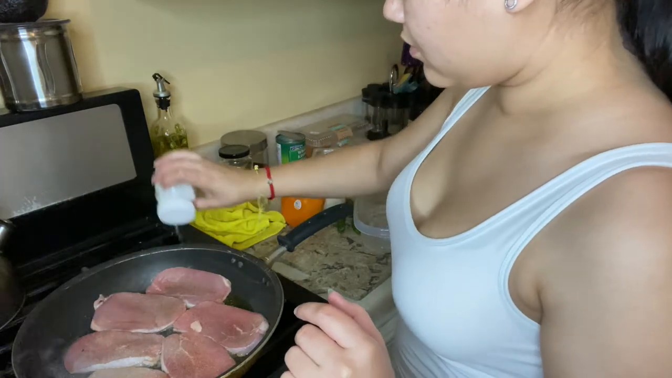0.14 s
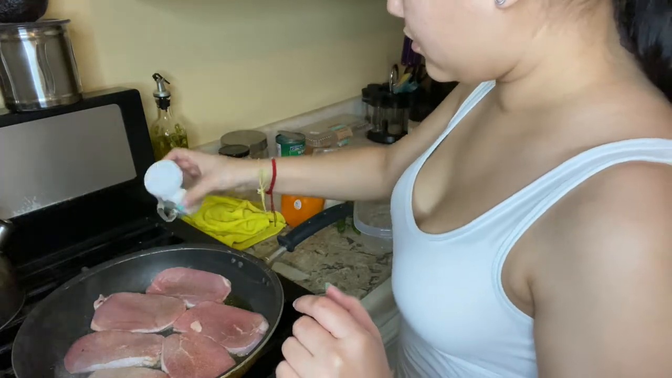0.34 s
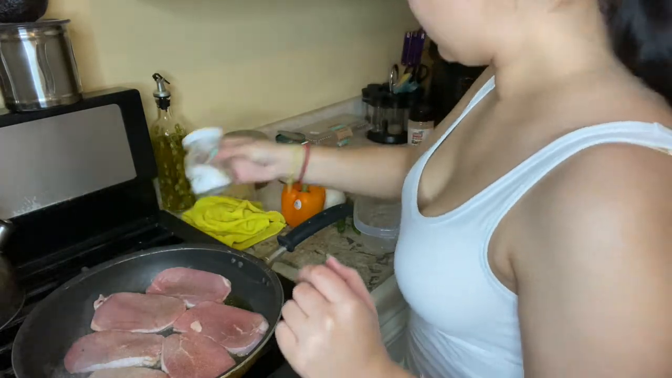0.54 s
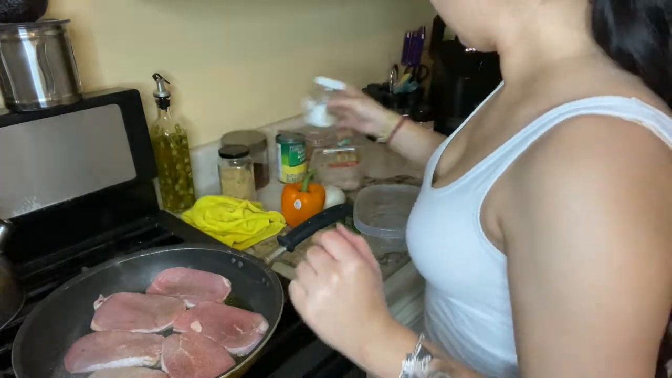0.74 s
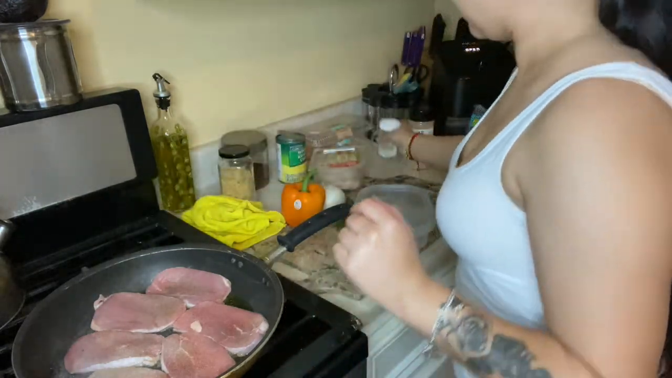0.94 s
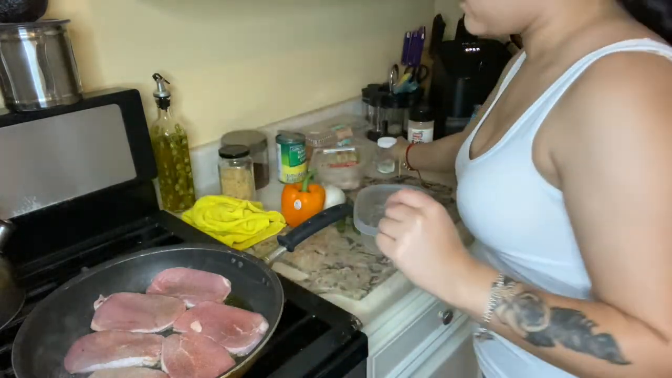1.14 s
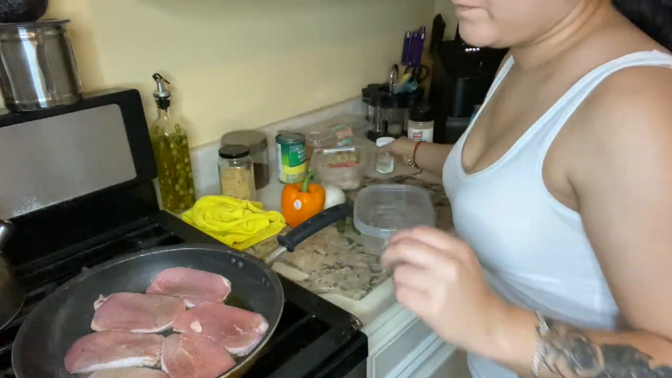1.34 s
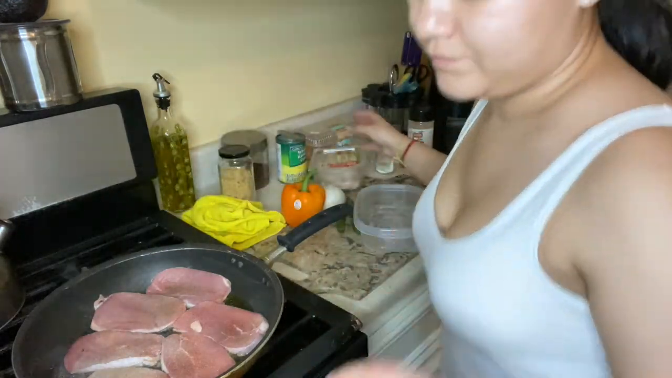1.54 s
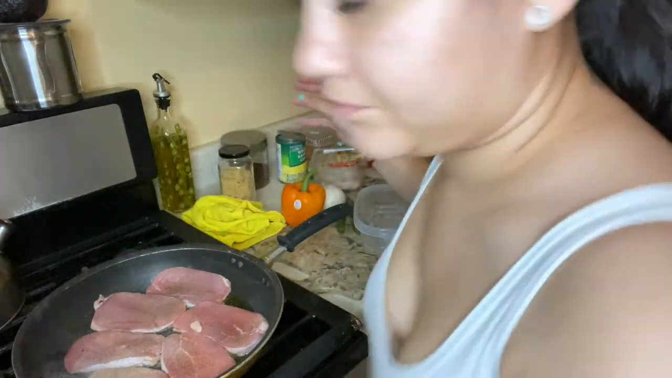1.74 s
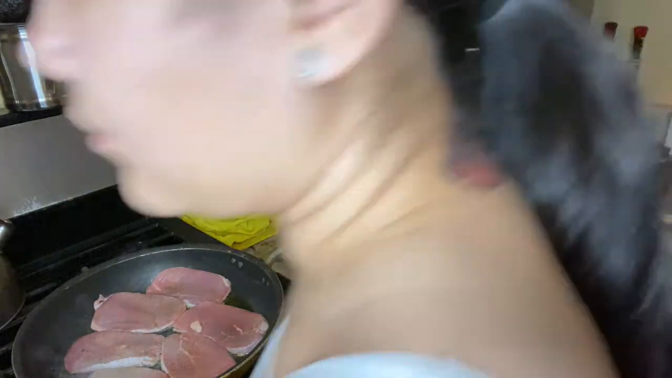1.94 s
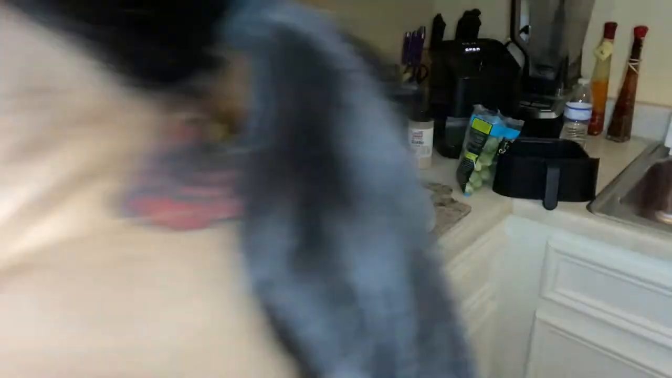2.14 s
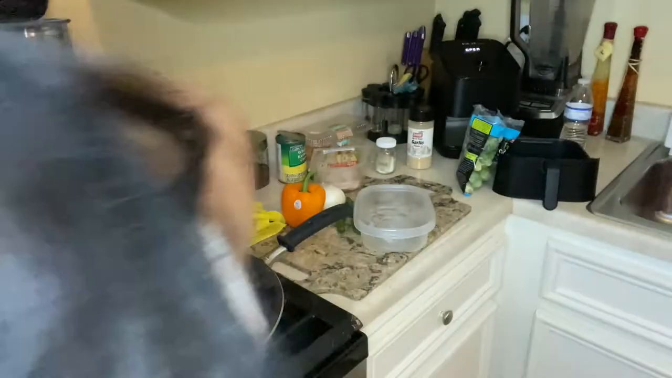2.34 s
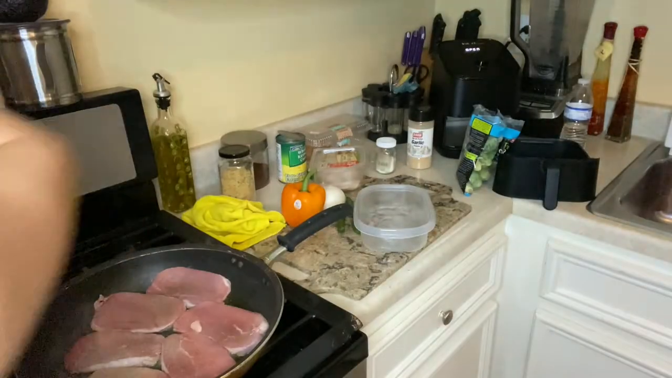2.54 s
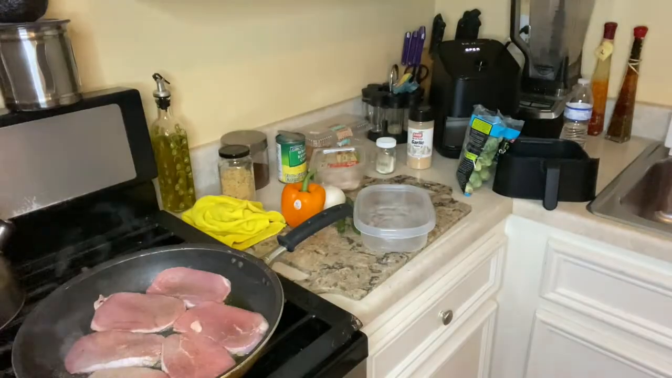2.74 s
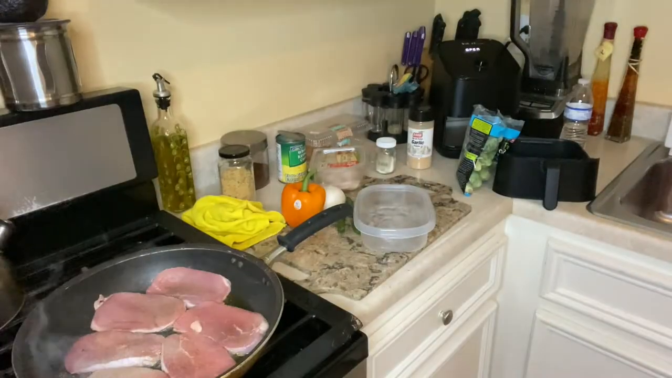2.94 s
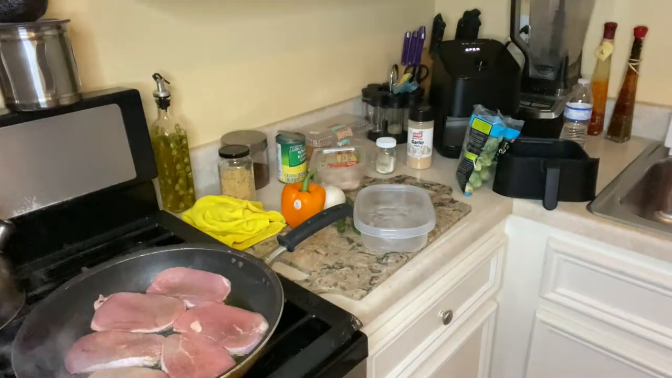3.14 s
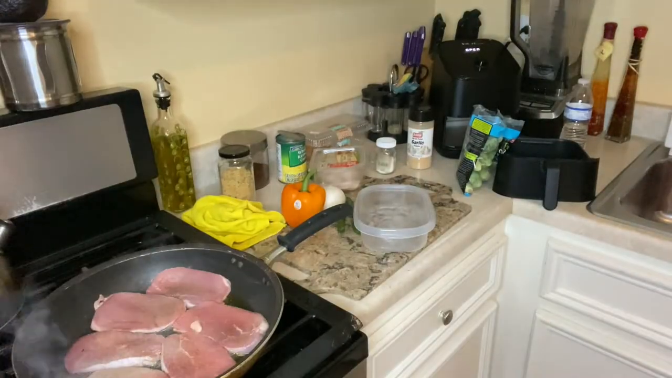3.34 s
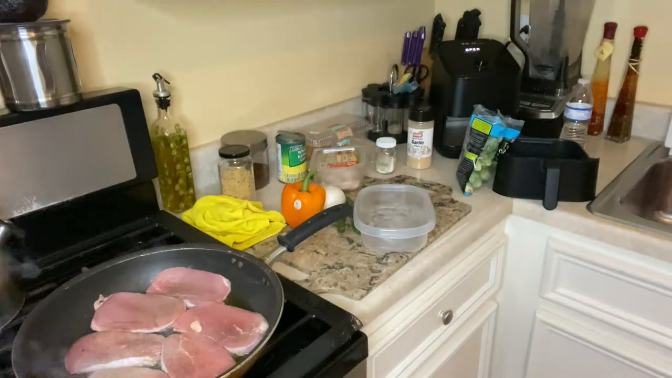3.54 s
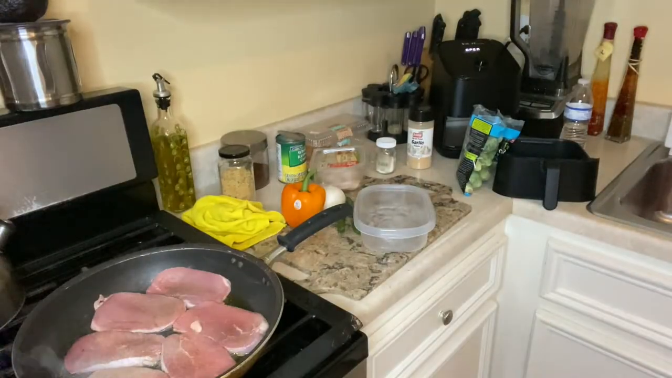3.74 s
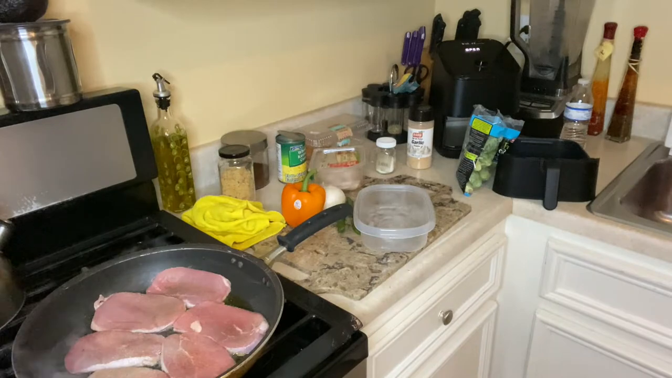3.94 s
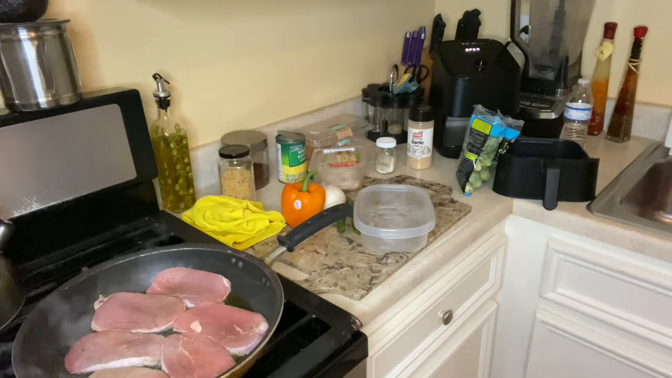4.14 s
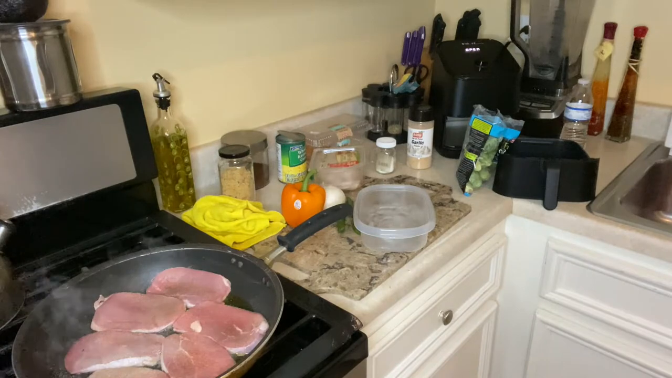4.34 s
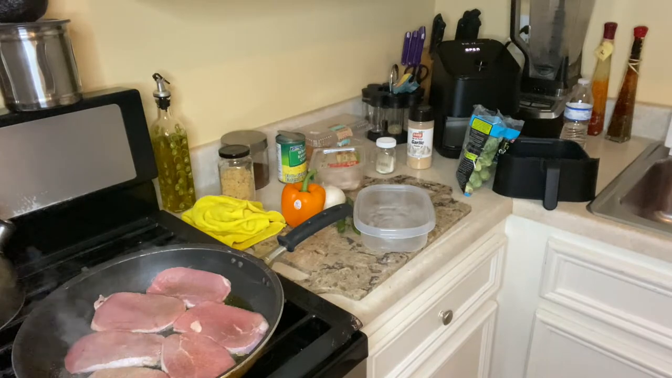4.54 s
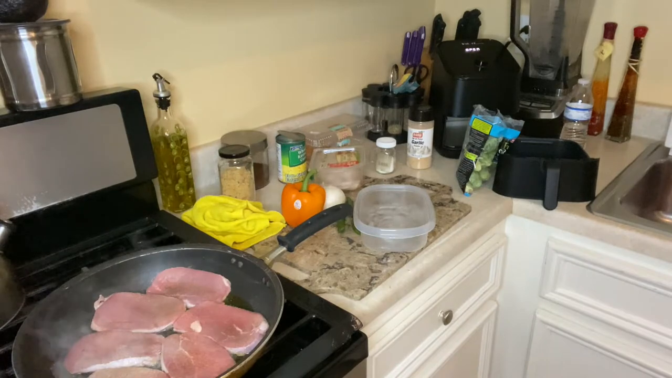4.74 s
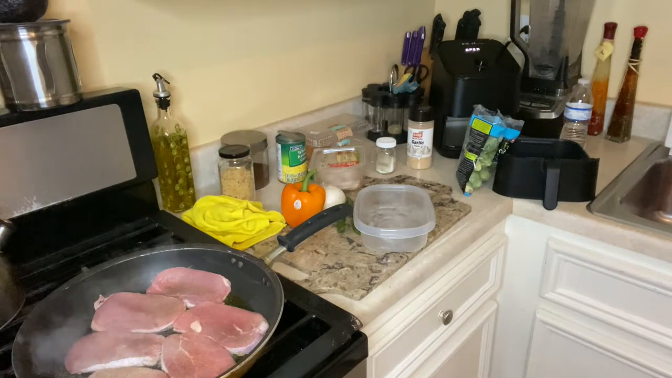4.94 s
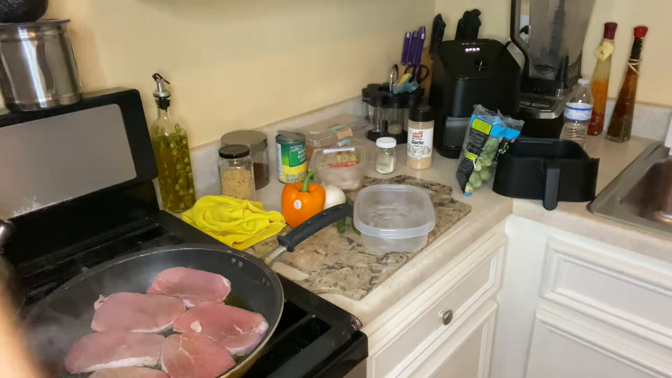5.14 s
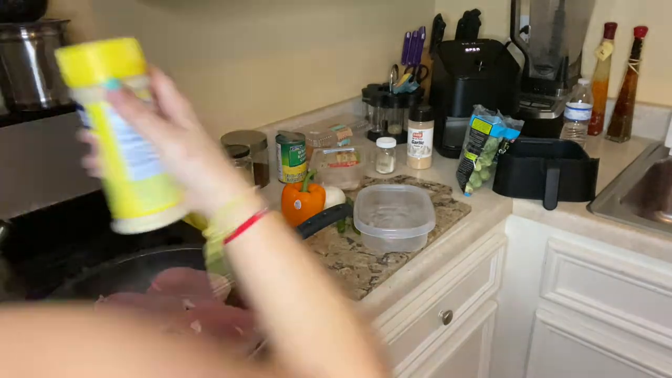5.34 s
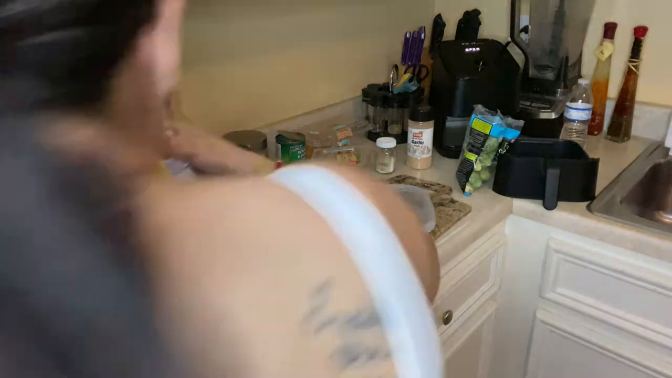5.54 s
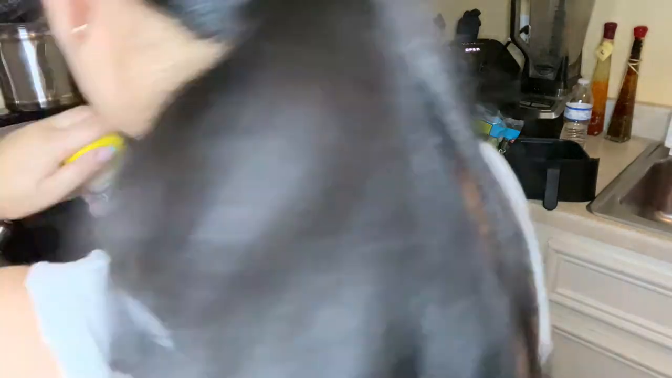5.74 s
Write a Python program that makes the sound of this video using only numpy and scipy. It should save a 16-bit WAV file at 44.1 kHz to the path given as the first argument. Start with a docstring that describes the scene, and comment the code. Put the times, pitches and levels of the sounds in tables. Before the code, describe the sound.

Over a softly hissing pan and low hum, a jar lands, dull steps pass, a cupboard clatters and slams, and dry seasoning begins to shake.

```python
"""A jar knocks and rings on a stone counter; then come footfalls, the knocks, scrapes and clacks of a cupboard,
its door slamming, and the first grains of a newly shaken jar, over a low hum and a hissing pan.
Blows sound as sums of decaying modes, clacks as short noise bursts, scraping as random slips that ring wood,
and grains, hum, rumble and hiss as shaped noise. The hiss dips, most as the cook passes.
A decaying noise response adds the room, and a two-port microphone limits the band."""
import sys
import numpy as np
from scipy import signal
from scipy.fft import rfft, irfft, next_fast_len
from scipy.io import wavfile
from scipy.ndimage import uniform_filter1d

SR = 44100
rng = np.random.default_rng(int(sys.argv[2]) if len(sys.argv) > 2 else 0)


def materialize(psi):
    """Save the field psi as 16-bit PCM at rate SR to the path in sys.argv[1].

    A 1-D psi becomes a single channel; in a 2-D psi each row is a channel.
    """
    bounded = np.clip(np.atleast_2d(psi).T, -1, 1)
    quanta = np.round(bounded * 32767).astype(np.int16)
    wavfile.write(sys.argv[1], SR, quanta)


N = 259308  # length in samples


def amp(db):
    """Logarithmic level: decibels become a pressure ratio."""
    return 10 ** (np.asarray(db) / 20)


def evened(x):
    """Mean-square normalisation: scales a signal to rms 1."""
    return x / np.sqrt(np.mean(x ** 2) + 1e-20)


def read(points, hz):
    """Logarithmic pitch scale: interpolates a spectrum over log frequency."""
    f, value = np.transpose(points)
    return np.interp(np.log(hz + 1), np.log(f + 1), value)


def curve(rows, t, axis=1):
    """Envelope: interpolates one column of a time table."""
    rows = np.transpose(rows)
    return np.interp(t, rows[0], rows[axis])


def add(mix, s, sound):
    """Superposition: adds a sound to the mix from time s on."""
    part = mix[round(s * SR):][:len(sound)]
    part += sound[:len(part)]


# Every mode has a weaker neighbour: largest detuning as a share of pitch, and its relative level in dB.
TWIN_SPREAD, TWIN_DB = 0.018, -9


def blow(modes, db, centre, spread, ring_factor, swell_cycles, chatter_ms):
    """Modal synthesis: a blow excites decaying modes near its centre pitch; low modes swell slowly."""
    t = np.arange(SR // 2) / SR
    hz, mode_db, t60 = np.transpose(modes)[:, :, None]
    octaves_off = np.log2(hz / 100) - centre
    height = np.exp(-.5 * (octaves_off / spread) ** 2) * amp(mode_db)
    # the edge lands unevenly, so the modes start apart
    late = rng.random(hz.shape) * chatter_ms / 1000
    since = np.maximum(t - late, 0)
    swell = 1 - np.exp(-since * hz / swell_cycles)
    envelope = height * swell * amp(-60 * since / t60 / ring_factor)
    # two close pitches beat
    twin_hz = hz * (1 + TWIN_SPREAD * rng.uniform(-0.82, 1, hz.shape))
    main = np.sin(2 * np.pi * hz * since)
    twin = amp(TWIN_DB) * np.sin(2 * np.pi * twin_hz * since)
    ring = envelope * (main + twin) / (1 + amp(TWIN_DB) / 2)
    return amp(db) * ring.sum(0) / np.linalg.norm(height)


def blows(hits, modes, swell_cycles, chatter_ms):
    """Superposition of blows: each hit rings the same set of modes."""
    out = np.zeros(N)
    for s, *how in hits:
        add(out, s, blow(modes, *how, swell_cycles=swell_cycles, chatter_ms=chatter_ms))
    return out


# Resonances of clacking jars. Each row: frequency in Hz, width in Hz, height in dB.
JAR_RESONANCES = [(950, 130, 2), (2250, 570, 1.5), (3340, 990, -0.5), (4100, 380, 3), (8400, 2100, 10)]


def clack(db, length_ms, tilt_db, rise_ms):
    """Impulsive contact: a burst of tilted noise, coloured by jar resonances, rises and decays."""
    count = 4096
    hz, ms = np.fft.rfftfreq(count, 1 / SR), np.arange(count) / SR * 1000
    tilt = amp(tilt_db * np.log2(np.maximum(hz, 700) / 3000))
    bass_cut = hz ** 2 / (hz ** 2 + 600 ** 2)
    resonance_db = sum(peak_db / (1 + (2 * (hz - f) / width) ** 2) for f, width, peak_db in JAR_RESONANCES)
    colour = tilt * bass_cut * amp(resonance_db)
    burst = irfft(rfft(rng.standard_normal(count)) * colour)
    # the level refers to the band from 1500 to 8000 Hz
    band = irfft(rfft(burst) * (hz > 1500) * (hz < 8000))
    envelope = (1 - np.exp(-ms / rise_ms)) * np.exp(-ms / length_ms)
    return amp(db) * burst / band.std() * envelope


# Left-right likeness of the noise. Each row: frequency in Hz, likeness from 0 to 1.
LIKENESS = [(60, 0.97), (200, 0.74), (500, 0.078), (1400, 0.12), (2000, 0.12), (2500, 0.11), (3500, 0.04),
            (5000, 0.13), (7000, 0.16)]
PORT_LAG_S = 7.4 / SR  # what the ports share arrives later at the right


def noise(field_db, size, count):
    """Partial coherence: two-port noise whose dB over (Hz, s) the given rule sets."""
    hop = size // 4
    hz = np.fft.rfftfreq(size, 1 / SR)[:, None]
    t = np.arange(count // hop + 5) * hop / SR
    a, b, c, d = rng.standard_normal((len(t), len(hz), 4)).T
    same = np.clip(read(LIKENESS, hz), 0, 1)
    left, own = a + 1j * b, c + 1j * d
    trail = np.exp(-2j * np.pi * hz * PORT_LAG_S)
    right = same * left * trail + np.sqrt(1 - same ** 2) * own
    spectra = np.array([left, right]) * amp(field_db(hz, t))
    return signal.istft(spectra, nperseg=size, noverlap=size - hop)[1][:, :count]


# The jar lands on rim and base, then rocks. Each row: start in seconds, level in dB,
# centre of the ring in octaves over 100 Hz, spread in octaves, ring length factor.
JAR_HITS = [(1.111, -10.5, 5.5, 2.4, 0.59), (1.1132, -9, 3.54, 2.54, 1.24), (1.138, -20.5, 2.1, 0.39, 0.95),
            (1.158, -25, 3.1, 0.25, 1), (1.205, -30, 2.7, 0.44, 0.91)]
# Modes of jar and counter. Each row: frequency in Hz, level in dB, nominal 60 dB decay in seconds.
COUNTER_MODES = [(200.5, 0, 0.14), (267, -3, .07), (300, 0, 0.05), (369, -5.5, 0.11), (408, -3.5, 0.12),
                 (432.7, -2.5, 0.113), (520, -9, 0.069), (596, -11, 0.13), (730, -2, 0.093),
                 (860, -12, .05), (906, -4, 0.2), (980, -0.5, 0.032), (1085, -0.5, 0.066),
                 (1090, -12, 0.026), (1353, 5.5, 0.022), (1470, -4, 0.044), (1690, -15, .04),
                 (1750, -4.5, 0.027), (2020, -9, 0.028), (2250, -11.5, 0.042), (2630, -11.5, 0.09),
                 (2860, -24, .02), (3280, -11.5, 0.023), (3650, -20, .015), (4330, -24, 0.012)]
# The glass cracks on the stone. One row: level in dB, decay constant in ms, tilt in dB per octave,
# rise constant in ms.
GLASS_CRACK = -25.5, 4, -11, 1.5


def jar():
    """Modal response to impact: the landing jar rings with the counter, and the contact cracks."""
    out = blows(JAR_HITS, COUNTER_MODES, swell_cycles=0.32, chatter_ms=1.7)
    add(out, JAR_HITS[0][0], clack(*GLASS_CRACK))
    return out


# Dense small modes of jar and slab. Each row: frequency in Hz, relative level in dB per Hz.
DIFFUSE_COLOUR = [(120, -7), (250, -3), (380, 1.5), (700, 3), (900, 1), (1300, -4), (1700, -1.5),
                  (2300, -8), (2600, -7), (3000, -14), (4000, -21.5), (7000, -37)]


def diffuse():
    """High modal density: a coloured pulse at the landing stands for modes heard only through the room."""
    size, out = 384, np.zeros(N)
    response = irfft(amp(read(DIFFUSE_COLOUR, np.fft.rfftfreq(size, 1 / SR))))
    pulse = np.roll(response, size // 2) * np.hanning(size)
    add(out, JAR_HITS[0][0], amp(7.5) * pulse / np.linalg.norm(pulse))
    return out


# Knocks on the cupboard, with a few dull footfalls; small parts ring high. Each row: start in seconds,
# level in dB, centre of the ring in octaves over 100 Hz, spread in octaves, ring length factor.
KNOCK_HITS = [(2.737, -26, 0.56, 0.44, 0.83), (3.9005, -27.5, 2.86, 0.28, 0.59),
              (3.908, -29, 1.3, 0.36, 1.8), (3.934, -26, 1, 0.67, 0.74), (3.919, -24, 0.24, 0.38, 0.55),
              (3.965, -27, 2.15, 0.14, 1.04), (3.983, -24, 0.2, .4, 0.4), (4.005, -30, 0.4, 0.27, 0.73),
              (4.028, -23.5, 2.06, 0.54, 0.51), (4.036, -18.5, 1.83, 0.34, 1.03),
              (4.045, -20, 0.42, 0.46, 0.84), (4.07, -44, 4.17, 0.09, 1.9), (4.088, -30.5, 2.7, 0.32, 0.66),
              (4.145, -32.5, 2.1, 0.23, 0.79), (4.174, -33, 0.18, 0.35, 0.4), (4.199, -31, 2.2, 0.9, 0.8),
              (4.254, -25.5, 0.23, 0.56, 0.67), (4.258, -46, 2.6, 0.73, 0.61),
              (4.289, -23.5, 2.98, .2, 0.6), (4.3342, -15, 3.08, 0.15, 0.65),
              (4.3354, -14.5, 1.64, 0.22, 0.43), (4.355, -26, 2.92, 0.7, 1), (4.38, -33, 1.5, 0.46, 0.73),
              (4.4, -34.5, 1.5, 0.34, 1.1), (4.425, -35, 1.57, 0.37, 0.65), (4.879, -37, 0.42, 0.36, 1.3),
              (5.012, -30, .08, 0.43, 0.75)]
# Modes of the woodwork. Each row: frequency in Hz, level in dB, nominal 60 dB decay in seconds.
WOOD_MODES = [(100.2, -3, 0.62), (119.3, 4.5, 0.17), (167, 5.5, 0.13), (225, 3.5, 0.12), (250, -9, 0.1),
              (289, 4, 0.09), (381, -1, 0.058), (428, -2, 0.12), (510, -10, 0.06), (600, -4, 0.11),
              (672, -3, 0.076), (716, -2, .08), (770, -1, 0.085), (831, 5, 0.051), (957, -5.5, 0.057),
              (1097, 2, 0.047), (1280, -4, 0.12), (1760, 4, 0.078), (2026, 4, 0.057), (2250, 3, 0.071),
              (2640, -16, .05)]


def knocks_and_footfalls():
    """Modal response to impact: cupboard knocks and a few dull footfalls each excite part of one mode set."""
    return blows(KNOCK_HITS, WOOD_MODES, swell_cycles=0.27, chatter_ms=2.15)


# The door shuts and rebounds. Each row: start in seconds, level in dB,
# centre of the ring in octaves over 100 Hz, spread in octaves, ring length factor.
SLAM_HITS = [(5.1093, -39, 4.7, .35, 1), (5.11, -23, 3, 0.4, 0.73), (5.1137, -8, 1.35, 0.45, .65),
             (5.125, -16, 0.88, 0.52, 0.81), (5.141, -19.5, 1.4, 1.1, 0.96), (5.162, -18, 1.3, 0.85, 0.96),
             (5.171, -17, 0.88, 0.43, 0.91)]
# Modes of the door panel. Each row: frequency in Hz, level in dB, nominal 60 dB decay in seconds.
DOOR_MODES = [(152, -8, 0.12), (171.6, 0.5, .12), (202, 2.5, 0.046), (228.5, -3.5, 0.107),
              (265, -6.5, 0.16), (314, -5.5, 0.087), (402, -5, 0.057), (426, -4, 0.073), (506, -7, 0.067),
              (720, -7, 0.11), (760, -8, 0.066), (954, -16, 0.082), (1080, -14, 0.07), (1270, -17, 0.055),
              (2690, -14, .06), (3290, -9, 0.045)]


def slam():
    """Plate resonance: the shutting and rebounding door rings its panel modes."""
    return blows(SLAM_HITS, DOOR_MODES, swell_cycles=0.41, chatter_ms=1.38)


# Door and jars scrape along. Each row: time in seconds, wood rumble in dB, rustle in dB.
SCRAPE_LEVELS = [(3.9, -38.5, -57), (4.03, -39, -61), (4.08, -35.5, -70), (4.18, -45.5, -62),
                 (4.24, -33.5, -63), (4.3, -36, -47.5), (4.38, -31.5, -62), (4.44, -50, -50),
                 (4.47, -62, -62)]


def scrape():
    """Stick-slip friction: uneven slips ring the wood while the door swings; packets rustle with it."""
    t = np.arange(N) / SR
    slipping = rng.random(N) < 600 / SR  # 600 slips per second on average
    slips = amp(3 * rng.exponential(1, N)) * rng.choice([-1, 1], N) * slipping
    ring = blow(WOOD_MODES, 0, 1.45, 1.47, 0.58, swell_cycles=0.25, chatter_ms=1.29)[:8000]
    rubbed = evened(signal.oaconvolve(slips, ring)[:N])
    rustle_band = signal.butter(2, [1400, 5000], "band", fs=SR, output="sos")
    rustle = evened(signal.sosfilt(rustle_band, slips + rng.standard_normal(N) * 0.56))
    moving = (t > SCRAPE_LEVELS[0][0]) * (t < SCRAPE_LEVELS[-1][0])
    wood_gain, rustle_gain = amp(curve(SCRAPE_LEVELS, t)), amp(curve(SCRAPE_LEVELS, t, axis=2))
    return moving * (rubbed * wood_gain + rustle * rustle_gain)


# Snap of a metal catch. Each row: start in seconds, level in dB.
CATCH_SNAPS = [(4.3335, -27.5)]
# Modes of the catch. Each row: frequency in Hz, level in dB, 60 dB decay in seconds.
CATCH_MODES = [(2300, 0, 0.052), (3220, -6, 0.031), (4130, -11, 0.055), (5050, -2, 0.038), (6530, 3, .04)]


def catch():
    """Modal response of small metal: a snap rings a few short high modes."""
    hits = [(s, db, 6.1, 3, 1.0) for s, db in CATCH_SNAPS]
    return blows(hits, CATCH_MODES, swell_cycles=.3, chatter_ms=1.54)


# Clacks and short rustles of jars and latch. Each row: start in seconds, level in dB,
# decay constant in ms, tilt in dB per octave, rise constant in ms.
CLACK_HITS = [(.87, -58, 25, 4, 1.5), (1.855, -58, 19, 7, 1.5), (2.722, -39, 17, -9, 20),
              (3.26, -53, 10, 7, 1.5), (3.901, -46, 4.8, -4, .8), (4.029, -39, 5.2, -13, .8),
              (4.258, -38.5, 7.4, -8, 1.3), (4.333, -25.5, 5.5, -6.5, 1.3), (4.349, -32, 5.1, -4.5, 1.5),
              (4.36, -40, 6.6, 2, 1.5), (4.374, -37, 7.8, -2, 1.5), (4.856, -44.5, 7.3, -6, 1.5),
              (5.109, -40.5, 12.7, -11, 1.5)]


def clacks():
    """Impulsive contact: jars and latch clack and rustle as short noise bursts."""
    out = np.zeros(N)
    for s, *how in CLACK_HITS:
        add(out, s, clack(*how))
    return out


# The landing jar, steps and the slam give deep thumps. Each row: start in seconds, level in dB.
DEEP_THUMPS = [(1.122, -21.5), (2.453, -31), (2.491, -23), (2.761, -21), (5.134, -9), (5.177, -10.5),
               (5.445, -27.5)]
# Modes of the thumps. Each row: frequency in Hz, level in dB, nominal 60 dB decay in seconds.
THUMP_MODES = [(71, 12, .16), (92.6, 2.5, 0.15)]


def thumps():
    """Low-order modes: the landing jar, steps and the slam each ring two deep modes."""
    hits = [(s, db, 0, 0.5, 0.89) for s, db in DEEP_THUMPS]
    return blows(hits, THUMP_MODES, swell_cycles=0.81, chatter_ms=0)


# Level of the grains in the shaken jar. Each row: time in seconds, level in dB.
SHAKE_LEVELS = [(5.856, -40), (5.863, -32), (5.89, -31.5)]
# Spectrum of the grains. Each row: frequency in Hz, relative level in dB per Hz.
GRAIN_COLOUR = [(600, -43), (1200, -10), (1620, 9.5), (1950, -24), (2330, 1.5), (3200, -12.5),
                (5000, -11.5), (16000, -9.5)]


def shake():
    """Dense collisions merge into noise: grains slide against the jar wall."""
    t = np.arange(N) / SR
    grains = evened(noise(lambda hz, s: read(GRAIN_COLOUR, hz) + 0 * s, size=256, count=N))
    return grains * amp(curve(SHAKE_LEVELS, t)) * (t > SHAKE_LEVELS[0][0])


# Dips in the hiss, most as the cook passes; a faint one while it eases.
# Each row: start in seconds, end in seconds, loss in dB (negative).
HISS_DIPS = [(1.936, 2.615, -3.5), (3.29, 3.997, -0.3), (5.13, 6.2, -3)]


def dip(t, sooner_s=0):
    """Time-varying attenuation: the loss in dB ramps in, holds and ramps out."""
    edge_s = 0.27
    return sum(db * np.clip(np.minimum(t - start, end - sooner_s - t) / edge_s, 0, 1)
               for start, end, db in HISS_DIPS)


# Spectrum of the pan hiss. Each row: frequency in Hz, relative level in dB per Hz.
HISS_COLOUR = [(300, -0.5), (700, -0.5), (1500, -2), (2000, -3), (2600, -1), (3200, -5), (5000, -7.5),
               (8000, -6.5), (10000, -9), (12500, -9), (16000, -17.5)]
# The treble loses a further share of the dip's dB, and regains it sooner.
TREBLE_LOSS, TREBLE_SOONER_S = 0.46, 0.065


def hiss():
    """Broadband noise under attenuation: the pan hiss dips, most in the treble, which also flickers."""
    # one value per noise frame; spatter makes the treble flicker
    flicker_db = 1.2 * evened(uniform_filter1d(rng.standard_normal(N // 128 + 5), size=5))

    def field(hz, s):
        """Frequency-dependent attenuation: the extra loss grows from 3 to 12 kHz."""
        treble = np.clip(np.log2(hz / 3000 + 0.0012) / 2, 0, 1)
        extra_db = TREBLE_LOSS * dip(s, TREBLE_SOONER_S)
        return read(HISS_COLOUR, hz) + dip(s) + treble * (extra_db + flicker_db)

    return amp(-62.5) * noise(field, size=512, count=N)


# Level of the low hum, with the soft thuds of steps in its swells. Each row: time in seconds, level in dB.
HUM_LEVELS = [(0.0, -56), (0.45, -48), (0.95, -54.5), (1.2, -46.5), (1.74, -45), (2.0, -49.5),
              (2.52, -46.5), (3.01, -54), (3.36, -41), (3.9, -52), (4.21, -60), (4.4, -54), (5.3, -49.5),
              (5.5, -37.5), (5.62, -55), (5.88, -40.5)]
HUM_HZ, HUM_WIDTH_HZ = 59.26, 2


def hum():
    """Narrow-band noise: a resonance-shaped line makes the low hum, and its swells the soft thuds of steps."""
    def line(hz, s):
        """Resonance curve: the level falls away on both sides of the hum."""
        return -20 * np.log10(1 + ((hz - HUM_HZ) / HUM_WIDTH_HZ) ** 2) + 0 * s

    t = np.arange(N) / SR
    return amp(curve(HUM_LEVELS, t)) * evened(noise(line, size=4096, count=N))


# Spectrum of the appliance rumble. Each row: frequency in Hz, relative level in dB per Hz.
RUMBLE_COLOUR = [(15, -51), (25, -38), (36, -24.5), (59, 0), (86, -20), (107, -8.5), (182, -14.5),
                 (232, -5.5), (344, -18.5), (381, -8), (484, -27), (537, -17), (1500, -40), (1950, -26.5),
                 (3300, -120)]


def rumble():
    """Frequency-dependent attenuation: low appliance noise dips with the hiss, but its bass is spared."""
    def field(hz, s):
        """Sloping loss: the attenuation grows up to 900 Hz."""
        return read(RUMBLE_COLOUR, hz) + np.clip(hz / 900, 0, 1) * dip(s)

    lean = amp([[-.6], [.6]])  # dB, slightly stronger at the right
    return amp(-49.5) * evened(noise(field, size=2048, count=N)) * lean


# Reverberation time by band. Each row: frequency in Hz, nominal 60 dB decay in seconds.
ROOM_DECAY = [(60, 0.14), (200, 0.75), (700, 0.77), (2000, 0.96), (3000, 0.94), (4000, 0.63), (10000, 0.18)]


def room(x, reach, early_db):
    """Reverberation: nearby surfaces answer briefly, then the tail dies band by band."""
    t = np.arange(SR // 2) / SR
    tail = noise(lambda hz, s: -60 * s / read(ROOM_DECAY, hz) / reach, size=256, count=SR // 2)
    early = 1 + amp(early_db) * np.exp(-t / 0.029)
    tail = tail * (1 - np.exp(-t / 0.00086)) * early
    return signal.fftconvolve(x[None], tail / np.linalg.norm(tail[0]), axes=1)[:, :N]


def ports(x, lag, lean_db):
    """Interaural cues: the right port hears lag samples later; the lean raises left and lowers right."""
    return np.array([x * amp(lean_db), np.roll(x, lag) / amp(lean_db)])


def scene():
    """Superposition: direct sounds, their reverberation, the shaken grains and the background."""
    jar_dry, small_dry = jar(), catch() + clacks()
    side_dry = scrape() + knocks_and_footfalls() + slam()
    direct = ports(jar_dry, -1, -1.2) + ports(side_dry, 25, 0.41)
    direct = direct + ports(small_dry, 17, 1.5) + ports(thumps(), 60, .4)
    jar_room = room(amp(-9) * jar_dry + diffuse(), reach=0.86, early_db=1.0)
    side_room = room(amp(-7) * side_dry + amp(-2.0) * small_dry, reach=0.74, early_db=-1.0)
    return direct + jar_room + side_room + shake() + hiss() + hum() + rumble()


# Treble shared by the ports. Each row: frequency in Hz, share from 0 to 1.
SHARED_TREBLE = [(6500, 0.03), (8500, 1), (16000, 1)]


def record(dry):
    """Coherent pickup and band limits: the ports share treble, the right trailing; deep bass and top are cut."""
    size = next_fast_len(N + 4096)
    hz = np.fft.rfftfreq(size, 1 / SR)
    left, right = rfft(dry, size)
    trail = np.exp(-2j * np.pi * hz * PORT_LAG_S)
    shared = np.clip(read(SHARED_TREBLE, hz), 0, 1)
    right = np.sqrt(1 - shared ** 2) * right + shared * trail * left
    heard = irfft(np.array([left, right]), size)[:, :N]
    heard = signal.sosfilt(signal.butter(2, 48, "high", fs=SR, output="sos"), heard)
    top_cut = signal.firwin(511, 15850, window=("kaiser", 9), fs=SR)  # edge in Hz
    return signal.oaconvolve(heard, top_cut[None], "same")


dry = scene()
out = record(dry)
materialize(out)
```